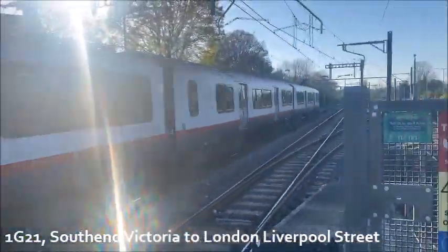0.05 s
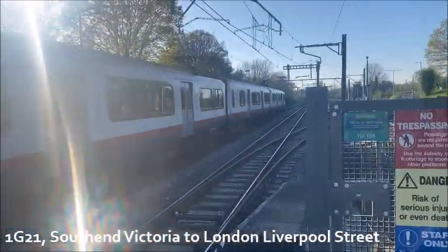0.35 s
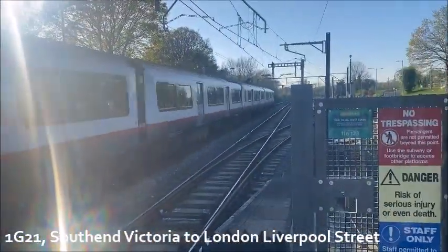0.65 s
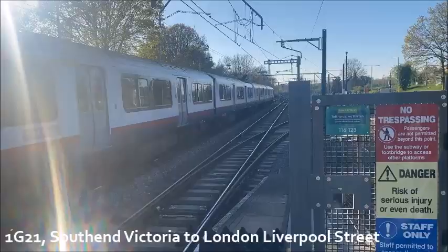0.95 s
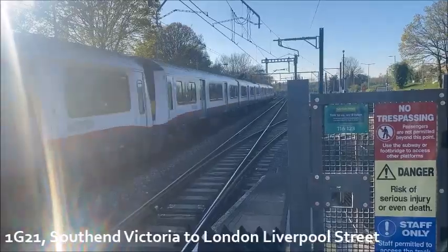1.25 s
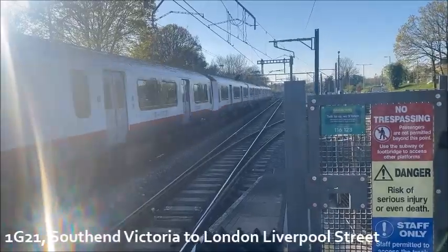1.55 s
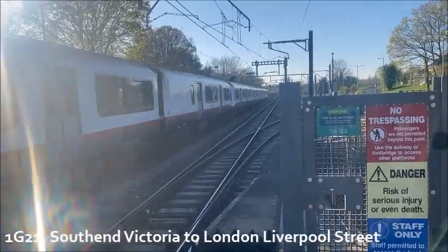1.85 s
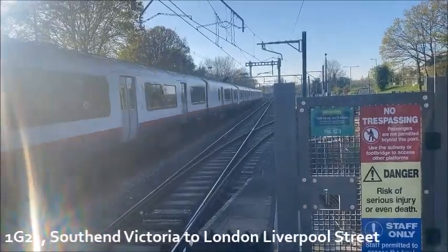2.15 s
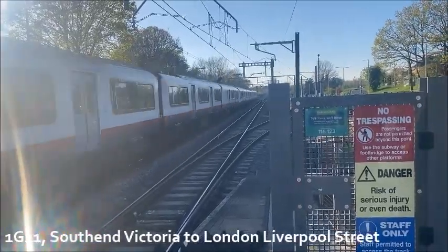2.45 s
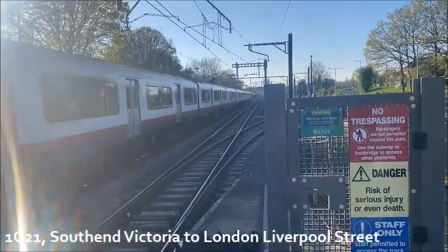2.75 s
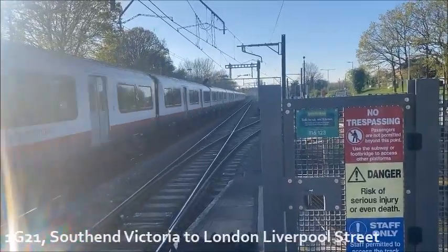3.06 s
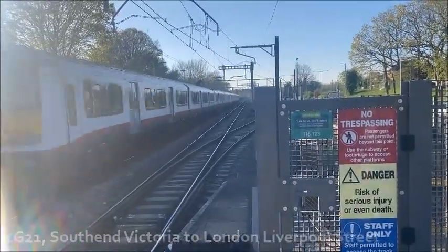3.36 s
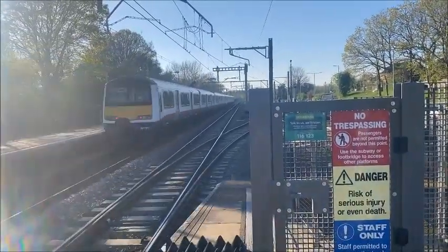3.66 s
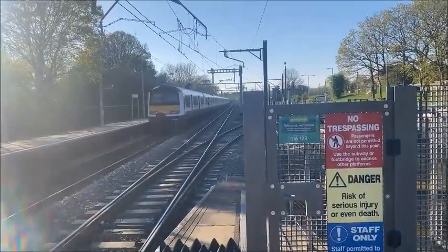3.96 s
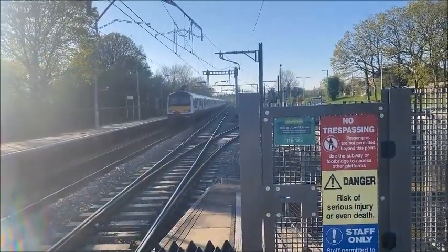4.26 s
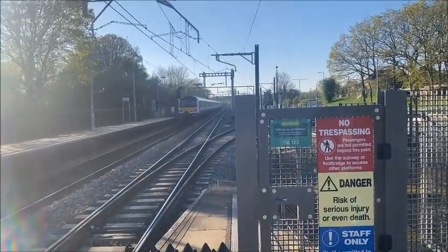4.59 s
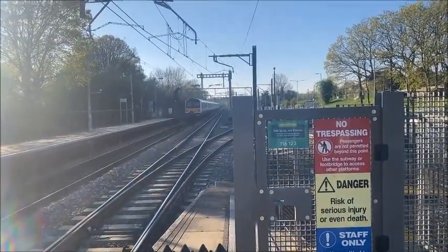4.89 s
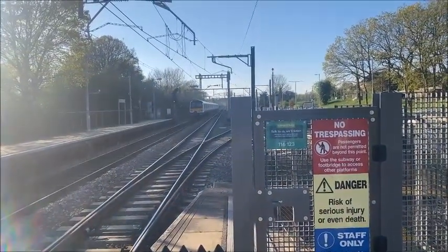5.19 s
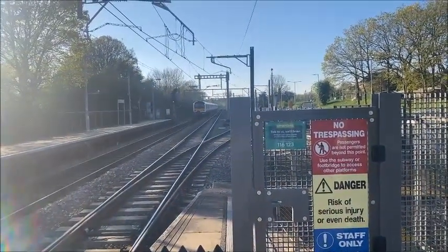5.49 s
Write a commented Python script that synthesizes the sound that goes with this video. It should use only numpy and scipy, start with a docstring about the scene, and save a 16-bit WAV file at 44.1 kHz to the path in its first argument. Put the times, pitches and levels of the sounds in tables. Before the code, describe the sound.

Loud wheel rumble, hiss and metallic clatter of a passing electric train, dropping away to a receding roll and a faint whining tone.

```python
"""Electric train passing a platform end

Rough wheels on rails, a few metres off: wheels ring and hiss, rails roar, bogies rumble and knock
over the points, coach bodies drone. After the last coach the level falls quickly; a thin whine
and a few far clacks linger over the receding roll and distant traffic."""
import sys
import numpy as np
from scipy import signal
from scipy.fft import rfft, irfft
from scipy.io import wavfile
from scipy.ndimage import uniform_filter1d

SR = 44100
rng = np.random.default_rng(int(sys.argv[2]) if len(sys.argv) > 2 else 0)


def generate_wav(signal):
    """Clip the signal to [-1, 1] and save it as 16-bit WAV at the path in sys.argv[1]."""
    frames = np.transpose(np.atleast_2d(signal))
    scaled = np.clip(frames, -1, 1) * 32767
    pcm = np.round(scaled).astype(np.int16)
    wavfile.write(sys.argv[1], SR, pcm)


N = 252693
TIME = np.arange(N) / SR
FREQ = np.maximum(np.arange(N // 2 + 1) * SR / N, 1)

# Stereo image by frequency, top treble centred: freq_hz, coherence, left_lead_rad, left_minus_right_db
NEAR_IMAGE = [(100, 0.99, 0.2, 0.2), (300, 0.95, 0.8, 0.0), (500, 0.92, 1.7, 4.5), (680, 0.81, 1.2, 3.6),
              (1000, 0.8, 2.1, 2.4), (1550, 0.72, 2.9, -3.2), (2100, 0.71, 5.1, -1.3),
              (3000, 0.62, 7.4, 0.2), (3900, 0.13, 8.0, 0.6), (4700, 0.69, 6.7, 0.6),
              (5600, 0.18, 5.7, -0.3), (6800, 0.71, 6.5, -0.7), (9000, 0.7, 3.2, 0.0), (10600, 0.7, 0, 0)]
FAR_IMAGE = [(100, 0.98, 0, 0.3), (330, 0.96, 0.8, 0.4), (480, 0.66, 0.4, 8.0), (620, 0.75, 0.6, 2.7),
             (850, 0.8, 1.7, 3.7), (1200, 0.81, 2.5, 0.1), (1550, 0.75, 2.4, -2.2), (1850, 0.24, 3.9, 0.6),
             (2500, 0.46, 6.3, 2.7), (3800, 0.7, 6.4, 2.6), (5600, 0.48, 6.4, 2.9), (6800, 0.73, 6.5, -0.5),
             (9000, 0.7, 3.2, 0.0), (10600, 0.7, 0, 0)]


def train(tail_s=3.07, crossfade_s=0.25, load_db=0.79, chatter_db=-0.02):
    """Close roll until the last coach passes, then a fading distant one; passing bogies swell both."""
    # Rolling noise spectra: freq_hz, relative_density_db
    near_colour = [(60, -3.5), (110, -1), (255, -2), (415, -12), (510, -5.5), (800, -1.5), (1400, -10),
                   (2150, -9.5), (3000, -19), (4000, -21), (6300, -26.5), (8000, -36.5), (9500, -72),
                   (12000, -51)]
    far_colour = [(60, 19), (100, -5.5), (170, -4.5), (400, -10.5), (620, -11.5), (900, -8), (1330, -17),
                  (2000, -7), (2450, -20.5), (3700, -23.5), (6600, -31), (8000, -35.5), (9500, -59.5),
                  (12000, -43.5)]
    # Wheel and rail resonances and dips: centre_hz, width_hz, lift_db
    near_modes = [(511, 170, 8), (641.6, 8.5, 8.5), (1020, 550, 5), (1340, 61, -2), (1560, 100, 2.5),
                  (1850, 130, 3.5), (2060, 48, 1), (2350, 220, 2.5), (2980, 340, 1.5), (3560, 210, 1),
                  (4870, 98, 5), (5650, 90, 3), (10240, 2100, 23.5)]
    far_modes = [(404, 49, -10), (1020, 140, 6), (1190, 230, 3.5), (1463, 64, 9), (2257, 63, 7.5),
                 (2470, 90, -3), (2640, 290, 7), (3280, 180, 4), (5000, 1900, 4), (6600, 400, 4),
                 (10300, 2200, 14.5)]
    # Rows for body, bogies, rails, wheels: near_db, far_db, fade_db_per_s, swell_lead_s, swell_sigma_s
    parts = [(-31.5, -41.5, 2.5, 0.14, 0.11), (-29, -35.5, 9, 0.1, 0.23), (-25.5, -33.5, 7, 0, 0.2),
             (-24.5, -33.5, 8.5, 0, 0.1)]
    # Coach ends passing, lastly a far rough spot: time_s, body_db, bogie_db, rail_db, wheel_db
    swells = [(.41, 3, 4, -1, 1.5), (.98, -3.5, 0, 1, 2), (1.52, 5, 0, -0.5, 2), (2.06, 8, 2, 2, 2),
              (2.659, 3.5, -5, -1.9, 1.5), (3.09, 3, -1.5, -0.5, 1.1), (4.02, -9, -1, 3.5, 0.5)]
    near = rolling(near_colour, near_modes, NEAR_IMAGE, boom_hz=57, boom_width_hz=59)
    far = rolling(far_colour, far_modes, FAR_IMAGE, boom_hz=49.6, boom_width_hz=14)
    near[0] = coach_drone(near[0], power_share=0.49, note_hz=56.7)
    far[0] = coach_drone(far[0], power_share=0.83, note_hz=51.0)
    gone = .5 + .5 * np.tanh((TIME - tail_s) / crossfade_s)
    behind_s = np.maximum(TIME - tail_s, 0)
    times_s, *lifts = np.transpose(swells)
    bounce_db = load_db * walk(26.0)  # bouncing axles load all contacts together
    out = 0
    for close, distant, lifts_db, part in zip(near, far, lifts, parts):
        near_db, far_db, fade_db_per_s, lead_s, sigma_s = part
        roll = close * np.sqrt(1 - gone) * undb(near_db)
        roll += distant * np.sqrt(gone) * undb(far_db - fade_db_per_s * behind_s)
        swell_db = sum(db * swell(at_s - lead_s, sigma_s) for at_s, db in zip(times_s, lifts_db))
        out = out + roll * undb(swell_db + bounce_db + chatter_db * walk(49))
    return out


def rolling(colour, modes, image, boom_hz, boom_width_hz):
    """Roughness shakes coach bodies, bogies, rails and wheels: four bands, each at rms 1."""
    # Band edges: body_top_hz, bogie_top_hz, rail_top_hz
    edges_hz = [80, 400, 1300]
    body_top_hz, bogie_top_hz, rail_top_hz = edges_hz
    lift_db = sum(db * resonance(hz, width_hz) ** 2 for hz, width_hz, db in modes)
    push = roughness(image)
    roll = push * undb(spectra(colour)[0] + lift_db)
    body = push * resonance(boom_hz, boom_width_hz) * highpass(46, order=6) * lowpass(body_top_hz)
    bogies = roll * highpass(body_top_hz) * lowpass(bogie_top_hz)
    rails = roll * highpass(bogie_top_hz) * lowpass(rail_top_hz)
    wheels = roll * highpass(rail_top_hz)
    return np.array([unit(irfft(part, N)) for part in (body, bogies, rails, wheels)])


def coach_drone(boom, power_share, note_hz, waver=0.0363, sway_db=0.5):
    """Coach bodies drone on one low, unsteady note within their boom."""
    hz = note_hz * (1 + waver * walk(15.0))
    drone = unit(np.sin(2 * np.pi * np.cumsum(hz) / SR) * undb(sway_db * walk(7.0)))
    return sustain(np.sqrt(1 - power_share) * boom + np.sqrt(power_share) * drone, over_s=0.18)


def ringing(mach=.04, flare_db=3.0):
    """Passing bogies ring, Doppler-sliding down; a faint low-mid bump comes after the train has gone."""
    # Resonances by name: centre_hz, width_hz
    modes = {"body": (136, 140), "frame": (325, 290), "hum": (480, 38), "rail": (507, 29),
             "motor": (710, 310), "high rail": (983, 260), "wheel": (2112, 300), "high wheel": (2330, 330),
             "flange": (2920, 520), "whistle": (4760, 380)}
    # Bogie rings, lastly the faint bump: peak_s, mode_name, sigma_s, level_db
    events = [(0.103, "motor", 0.094, -27), (0.263, "hum", 0.217, -36.5), (0.302, "whistle", 0.16, -49),
              (0.407, "motor", 0.0855, -23.5), (.42, "high wheel", .11, -35), (.57, "wheel", .04, -30),
              (.9, "wheel", 0.034, -29), (.98, "high wheel", 0.11, -32), (1.043, "wheel", 0.055, -26.5),
              (1.185, "wheel", 0.0295, -27.5), (1.469, "wheel", 0.062, -27.5),
              (1.581, "high wheel", .11, -42), (1.692, "wheel", 0.051, -31), (1.542, "frame", 0.047, -25.5),
              (1.937, "high rail", 0.056, -31), (1.971, "frame", 0.086, -27),
              (2.063, "motor", 0.1625, -25.5), (2.094, "flange", .09, -34), (2.099, "whistle", 0.15, -38.5),
              (2.163, "wheel", 0.099, -33), (2.393, "wheel", 0.0285, -25), (2.569, "wheel", .1, -27.5),
              (2.641, "rail", 0.247, -35.5), (2.661, "flange", 0.16, -38.5), (2.694, "body", 0.257, -36),
              (2.752, "high rail", 0.41, -30.5), (2.806, "wheel", .1, -27.5), (3.131, "wheel", .11, -28.5),
              (3.136, "flange", 0.13, -35.5), (3.166, "rail", 0.135, -36.5),
              (3.501, "high rail", 0.036, -31), (3.896, "body", 0.039, -35.5),
              (4.156, "rail", 0.188, -44.5), (4.43, "body", 0.152, -46), (5.557, "frame", 0.058, -54.5)]
    out = 0
    for at_s, name, sigma_s, db in events:
        hz, width_hz = modes[name]
        ring = irfft(roughness(NEAR_IMAGE) * resonance(hz, width_hz) ** 2, N)
        ring = sustain(ring * undb(flare_db * walk(15.6)), over_s=0.11)  # bogies flare on rough rail
        emitted_s = TIME - mach * np.hypot(sigma_s, TIME - at_s)
        shifted = np.array([np.interp(emitted_s, TIME, channel) for channel in ring])
        out = out + shifted * swell(at_s, sigma_s) * undb(db)
    return out


def knocks(rise_s=.011, waver=.06):
    """Wheels jolt over the points; each jolt starts a rough, quickly damped ring in the bogie."""
    # Frame thuds and higher clanks: start_s, pitch_hz, peak_db
    jolts = [(0.059, 725, -19), (.102, 293, -23), (0.167, 709, -19), (.284, 306, -23), (.35, 685, -20.5),
             (.421, 740, -20.5), (1.438, 803, -19.5), (1.482, 358, -19.5), (1.502, 246, -19),
             (1.532, 816, -21.5), (1.56, 265.6, -26), (1.873, 305, -22.5), (1.943, 840, -20.5),
             (1.966, 285, -21), (2.012, 365, -22), (1.996, 763, -19.5), (2.063, 755, -16.5),
             (2.108, 580, -22), (2.152, 732, -25), (2.245, 648, -21), (2.305, 715, -20.5)]
    paths = np.zeros((3, N))  # direct, scattered left, scattered right
    for path in paths:
        warped_s = np.cumsum(1 + waver * walk(90)) / SR
        for at_s, hz, db in jolts:
            age = np.maximum(TIME - at_s, 0) / rise_s
            live = (age > 0) & (age < 10)
            envelope = age[live] * np.exp(1 - age[live])
            path[live] += np.sin(2 * np.pi * hz * warped_s[live]) * envelope * undb(db)
    heard = rfft(paths)
    return irfft(arrive(heard[0], heard[1:], NEAR_IMAGE), N)


def whine(pitch_hz=500.5, start_s=3.62, stop_s=4.93, attack_s=.33, release_s=.08):
    """A rough, flat tone, carried back by several paths, steadies and breaks off into an echo."""
    # Harmonics: pitch_multiple, relative_db
    partials = [(1, -25), (2, 0), (3, -15), (4, -14)]
    stop_db, recede_db_per_s = -43.4, 4.0
    echo_db, echo_fade_db_per_s, scatter_db = -13, 17, -3
    settle_at_s, settle_s = 4.58, .22
    waver_rough, waver_steady, flatness = .01, .0038, .006  # fractions of the pitch
    flutter_hz, flutter_depth, flicker_db = 11, .7, 2.0
    attack = np.clip((TIME - start_s) / attack_s, 0, 1)
    after_s = np.maximum(TIME - stop_s, 0)
    release = np.maximum(1 - after_s / release_s, undb(echo_db - echo_fade_db_per_s * after_s))
    rough = .5 - .5 * np.tanh((TIME - settle_at_s) / settle_s)
    waver = waver_steady + (waver_rough - waver_steady) * rough
    hz = pitch_hz * (1 - flatness * rough)
    paths = np.zeros((3, N))  # direct, scattered left, scattered right
    for path in paths:
        for multiple, partial_db in partials:
            phase = 2 * np.pi * np.cumsum(multiple * hz * (1 + waver * walk(30.7))) / SR
            path += unit(np.sin(phase) * undb(flicker_db * walk(26))) * undb(partial_db)
    flutter_phase = 2 * np.pi * flutter_hz * np.cumsum(1 + .3 * walk(6)) / SR
    flutter = 1 - flutter_depth * rough * (.5 + .5 * np.sin(flutter_phase))
    level_db = stop_db + recede_db_per_s * np.maximum(stop_s - TIME, 0)
    heard = rfft(paths * attack * release * flutter * undb(level_db))
    return irfft(arrive(heard[0], heard[1:] * undb(scatter_db), FAR_IMAGE), N)


def far_clacks(t60_s=.035):
    """Small knocks far down the line, each a short damped ring."""
    # Distant knocks: start_s, pitch_hz, level_db
    clacks = [(5.0, 830, -38), (5.335, 800, -38), (5.408, 900, -30.5), (5.558, 470, -35)]
    rings = 0
    for at_s, hz, db in clacks:
        age_s = np.maximum(TIME - at_s, 0)
        decay = np.exp(-np.log(1000) * age_s / t60_s)
        rings = rings + np.sin(2 * np.pi * hz * age_s) * decay * undb(db)
    return irfft(arrive(rfft(rings), 0, FAR_IMAGE), N)


def traffic(level_db=-48.5, wander_db=-3.0):
    """Distant town traffic, masked until the train is far away."""
    # Traffic spectrum: freq_hz, relative_density_db
    colour = [(60, -15), (100, 0), (160, 6.5), (400, -4.5), (670, -2), (800, -39), (1200, -2.5),
              (2500, -21), (5000, -41), (9000, -76)]
    hum = irfft(roughness(FAR_IMAGE) * undb(spectra(colour)[0]), N)
    return unit(hum) * undb(level_db + wander_db * walk(5.4))


def roughness(image):
    """Stereo spectra of a random push, as of rough wheels on rails."""
    noise = rfft(rng.standard_normal((3, N)))
    return arrive(noise[0], noise[1:], image)


def arrive(direct, scattered, image):
    """Left and right spectra: direct and scattered sound mixed and placed by the stereo image."""
    coherence, lead_rad, balance_db = spectra(image)
    sides = np.array([[.5], [-.5]])
    shade = undb(sides * balance_db)
    pair = np.sqrt(coherence) * direct * np.exp(1j * sides * lead_rad)
    pair += np.sqrt(1 - coherence) * scattered
    return pair * shade / np.sqrt(np.mean(shade ** 2, axis=0))


def spectra(table):
    """Table columns interpolated over log frequency."""
    hz, *columns = np.transpose(table)
    return [np.interp(np.log(FREQ), np.log(hz), column) for column in columns]


def resonance(hz, width_hz):
    """Resonance gain, 1 at the centre."""
    return 1 / np.sqrt(1 + (2 * (FREQ - hz) / width_hz) ** 2)


def highpass(hz, order=8):
    """Butterworth high-pass gain."""
    return 1 / np.sqrt(1 + (hz / FREQ) ** (2 * order))


def lowpass(hz, order=8):
    """Butterworth low-pass gain."""
    return 1 / np.sqrt(1 + (FREQ / hz) ** (2 * order))


def walk(rate_hz):
    """Smooth random wander, rms 1."""
    return unit(irfft(rfft(rng.standard_normal(N)) * np.exp(-(FREQ / rate_hz) ** 2), N))


def swell(at_s, sigma_s):
    """Gaussian envelope, 1 at its peak."""
    return np.exp(-((TIME - at_s) / sigma_s) ** 2 / 2)


def sustain(stereo, over_s):
    """Hold rms at 1, keeping only flicker quicker than over_s."""
    power = uniform_filter1d(np.mean(stereo ** 2, axis=0), int(over_s * SR))
    return stereo / np.sqrt(power)


def undb(db):
    """Decibels to gain."""
    return 10 ** (np.asarray(db) / 20)


def unit(x):
    """Scale to rms 1."""
    return x / np.sqrt(np.mean(x ** 2))


def scene():
    """The train over distant traffic, in stereo."""
    return train() + ringing() + knocks() + whine() + far_clacks() + traffic()


def record(dry):
    """The phone cuts the top treble."""
    cutoff_hz = 12150
    return signal.sosfilt(signal.ellip(8, .2, 70, cutoff_hz, fs=SR, output="sos"), dry)


dry = scene()
out = record(dry)
generate_wav(out)
```